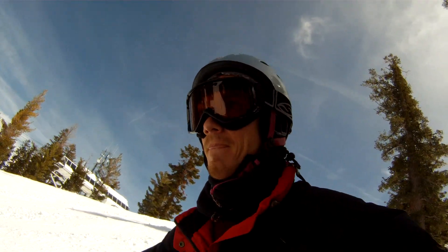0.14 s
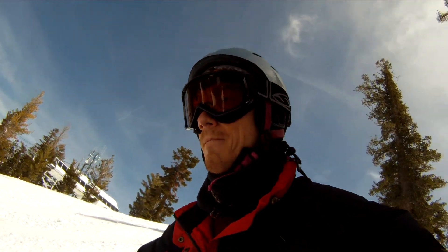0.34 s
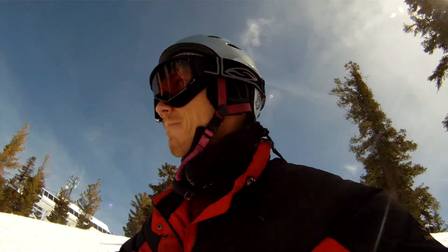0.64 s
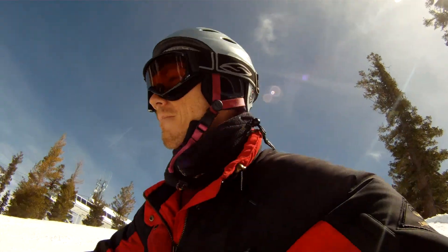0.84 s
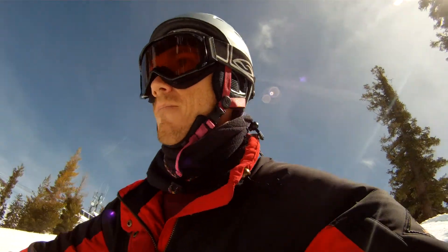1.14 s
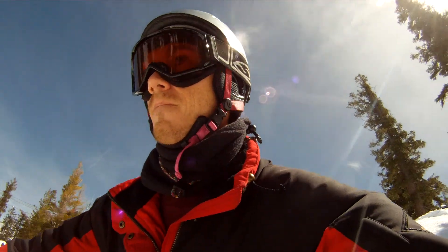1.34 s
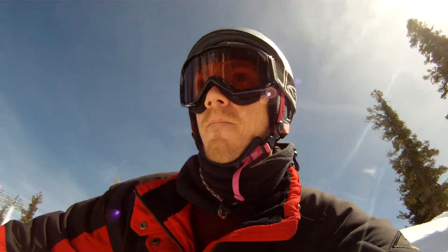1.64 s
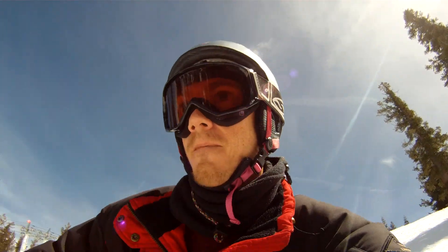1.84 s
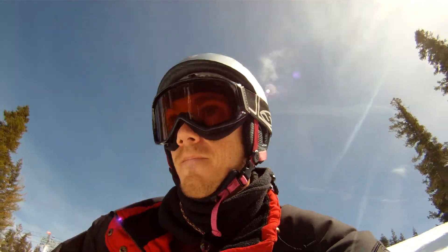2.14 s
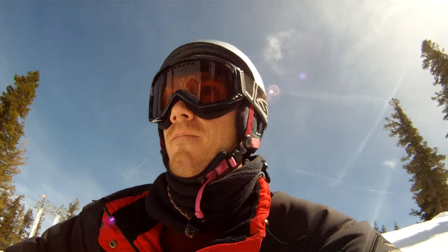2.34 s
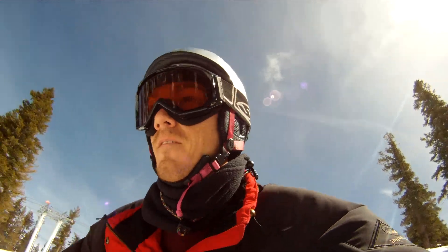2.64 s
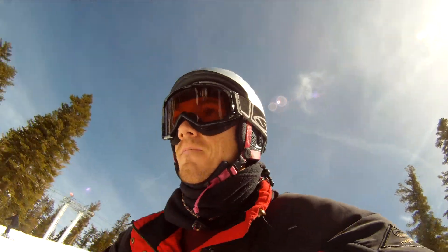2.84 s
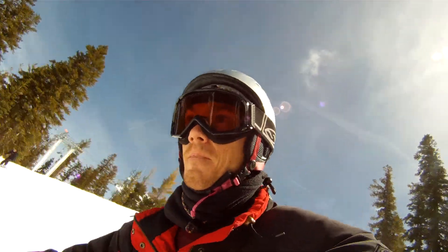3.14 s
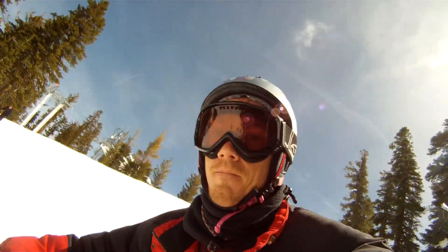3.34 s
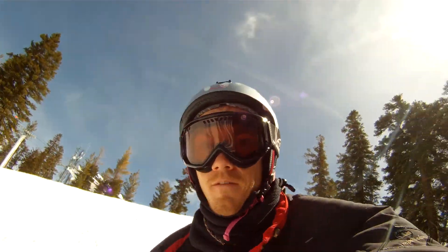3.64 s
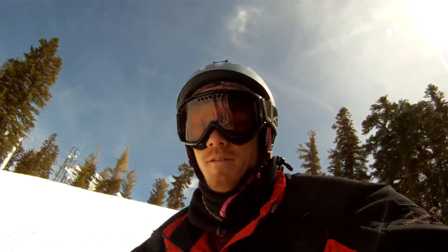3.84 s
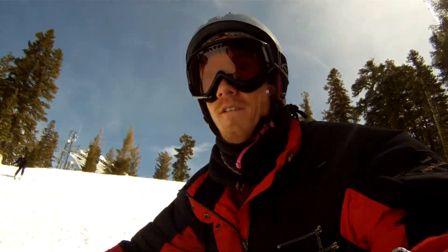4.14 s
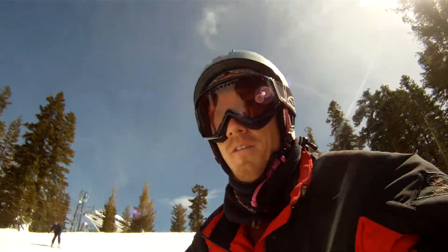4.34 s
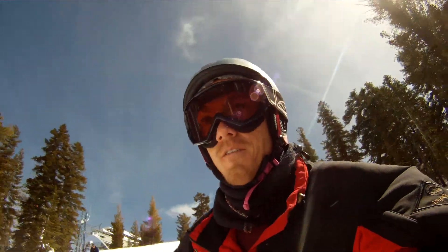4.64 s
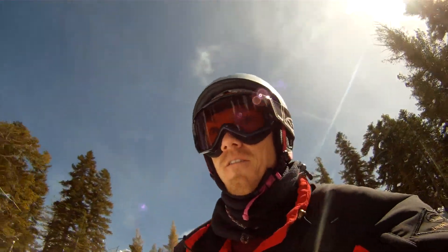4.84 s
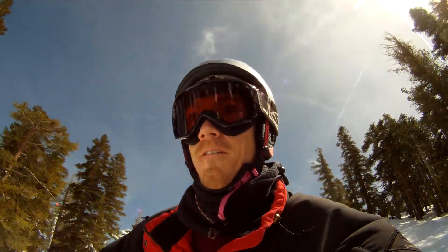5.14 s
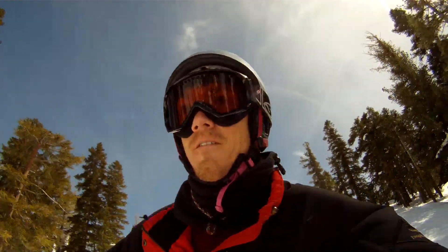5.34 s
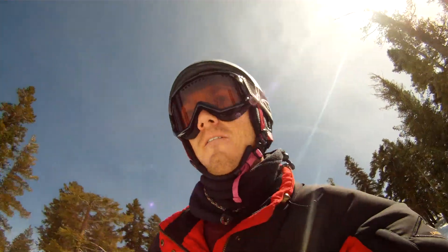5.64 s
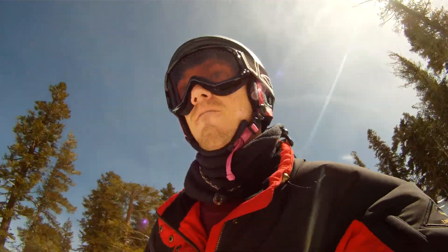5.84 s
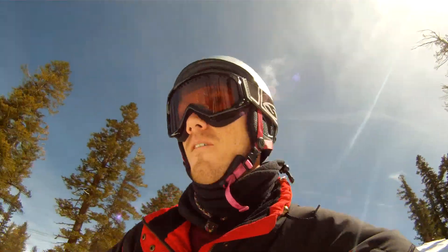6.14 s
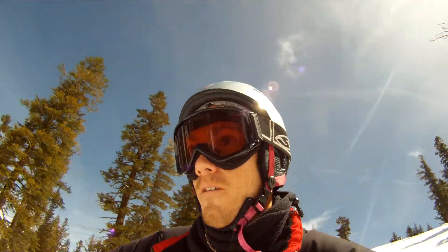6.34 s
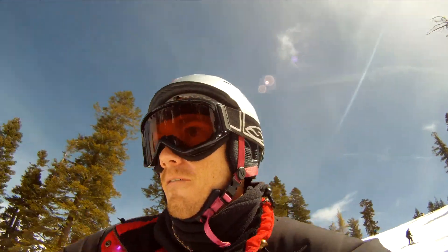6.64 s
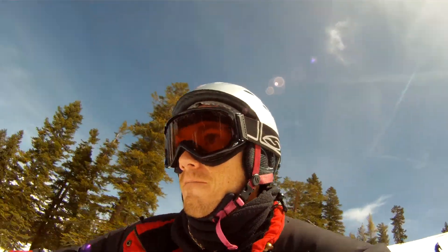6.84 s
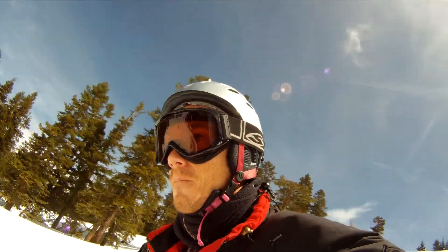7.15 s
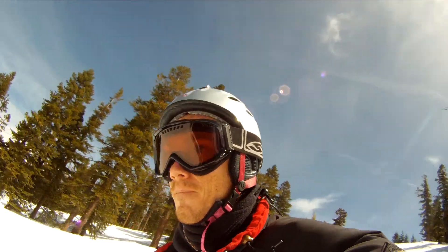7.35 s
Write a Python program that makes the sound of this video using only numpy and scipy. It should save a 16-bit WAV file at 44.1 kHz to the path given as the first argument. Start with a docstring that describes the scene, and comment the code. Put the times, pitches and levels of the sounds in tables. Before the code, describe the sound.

Skis swish and scrape over soft snow, muffled and hollow, over low wind rumble, with a brief plastic clatter midway.

```python
"""Skis glide and turn on soft snow: they swish as they break crystals, scrape and throw spray.
Now and then they crush a lump of crust, and the boards rumble with speed. It is all heard from inside
a closed plastic camera housing on a hand-held pole, which gives it a hollow ring. Wind and bumps
rumble below, flecks of snow tick on the housing, and in one turn the pole clacks in its mount."""
import sys
import numpy as np
from scipy import signal
from scipy.fft import rfft, irfft, next_fast_len
from scipy.io import wavfile

SR = 44100
rng = np.random.default_rng(int(sys.argv[2]) if len(sys.argv) > 2 else 0)


def dump(signal):
    """Clip the signal to [-1, 1] and save it as 16-bit WAV at the path in sys.argv[1]."""
    limited = np.clip(np.atleast_2d(signal).T, -1, 1)
    pcm = np.round(limited * 32767).astype(np.int16)
    wavfile.write(sys.argv[1], SR, pcm)


N = 331191
TIME = np.arange(N) / SR
FFT_SIZE = 2 * next_fast_len(N // 2 + SR // 2)
FREQS = np.maximum(np.fft.rfftfreq(FFT_SIZE, 1 / SR), 1)

# how strong the low and high parts of the wind and the boards' rumble are: f/Hz, level/dB
WIND_SPECTRUM = [(5, -17), (14, 1.5), (26, 0.5), (50, -6.5), (80, -11.5), (105, -15.5), (160, -22.5),
                 (260, -28), (600, -42), (2000, -87)]
BOARD_SPECTRUM = [(60, -47), (130, 9), (260, 2.5), (340, 1.5), (500, 1), (800, -1), (1100, -0.5), (1700, 0),
                  (3000, -34), (6000, -56)]
# bumps that shake the housing: t/s, peak level/dB, half length/s, time the pole wobbles on/s
BUMPS = [(.212, -33, 0.0066, .22), (.797, -37, 0.0057, 0), (1.065, -35.5, .008, 0), (2.8, -35, 0.0085, .16),
         (3.994, -36, .0022, 0), (4.172, -31.5, 0.0013, 0), (4.187, -31, 0.00077, 0),
         (4.263, -31.5, .003, 0), (5.1437, -30, 0.0019, 0), (5.406, -33, 0.0072, .09),
         (6.464, -30.5, 0.011, 0), (6.936, -32, .008, 0)]
# the pole strikes its mount: t/s, level/dB, brightness f/Hz
POLE_KNOCKS = [(3.9868, -19, 450), (4.076, -30, 1500), (4.084, -26.5, 1200), (4.176, -23, 2000),
               (4.1861, -16, 2500), (4.1897, -5.5, 1700), (4.1947, -15.5, 3000), (4.1966, -16, 12000),
               (4.202, -31, 12000), (4.2085, -28, 9000), (4.264, -26, 1200), (4.434, -29, 1500),
               (4.528, -34, 1200)]
# the pole shudders through the hardest turn: t/s, level/dB
POLE_SHUDDER = [(3.95, -63), (4.05, -52), (4.2, -44), (4.38, -46.5), (4.49, -49.5), (4.56, -61)]
# tones that the pole and the housing wall ring with: f/Hz, level/dB, time to fade by 60 dB/s
POLE_TONES = [(239, -27, 0.013), (454, -13, 0.012), (680, -13.5, 0.026), (1150, -1.5, 0.012),
              (1316, -1.5, 0.024), (1540, -2.5, 0.034), (2007, -3, 0.041), (2380, -4.5, 0.017),
              (3532, -6.5, 0.039), (4980, -11, 0.0052), (7100, -16, .01), (8360, -12.5, 0.038),
              (9740, -7.5, 0.014), (9980, -7, 0.026), (10650, -4.5, 0.02), (13520, -5, 0.017),
              (14020, -3, .018)]
WALL_TONES = [(190, -12, 0.017), (344, -10, 0.0084), (796, -23, 0.0023), (1520, -15.5, 0.018),
              (1893, -5, 0.009), (2215, 1.5, 0.0055), (2900, -2.5, 0.0051), (3800, -13, 0.0067),
              (4430, -14, 0.0039), (6850, -17, 0.0054), (8950, -10, 0.0043), (10070, -13.5, 0.012),
              (14100, -12, 0.011), (14700, -17, .006)]
# flecks of snow hit the housing: t/s, level/dB, pitch of the spot f/Hz
SNOW_FLECKS = [(0.1353, -33, 2880), (0.1354, -30, 1400), (0.5317, -31.5, 3740), (0.725, -31, 2480),
               (.764, -29, 2420), (0.7706, -30, 1420), (2.9728, -31.5, 2320), (3.061, -37.5, 3100),
               (3.5632, -29, 2450), (4.577, -33, 1900), (4.5956, -30, 1880), (5.1415, -17, 2010),
               (5.142, -26, 2000), (7.3952, -28.5, 2070)]
# what the housing lets through from each source: f/Hz, width/Hz, level/dB
SHUDDER_COLOUR = [(250, 120, -5), (580, 110, -1), (758, 89, 5.5), (914, 58, 0), (1250, 200, -6),
                  (1540, 140, 0), (1900, 290, 2.5), (3430, 140, 5.5), (3900, 610, -2.5), (8370, 810, -6)]
SPRAY_COLOUR = [(3780, 700, -0.5), (4803, 630, 1), (5543, 420, -4.5), (6450, 430, -5), (7135, 570, -2.5),
                (8240, 1700, -8.5)]
EDGE_COLOUR = [(720, 78, -10.5), (900, 300, -17), (1266, 198, 1), (1430, 250, -3.5), (2010, 390, -6.5),
               (10630, 370, -17), (13360, 310, -18.5)]
SWISH_COLOUR = [(1910, 260, -1), (2224, 300, 0.5), (2528, 380, -2), (2906, 350, -5.5), (3247, 380, -4),
                (3570, 254, -4.5), (3890, 380, -16), (5170, 610, -24.5), (8500, 550, -12),
                (9100, 920, -15.5), (9740, 700, -12), (12000, 3000, -39), (14100, 620, -14.5),
                (14800, 520, -14.5)]
# lumps of crust under a ski: t/s, level/dB, half length/s, iciness from 0 to 1
CRUST_LUMPS = [(0.529, -37.5, .008, 0), (.57, -48, 0.027, 0.01), (1.325, -46, 0.055, 0),
               (1.47, -45, 0.0042, 0), (1.546, -43.5, .025, 0.01), (1.781, -47, .007, .7),
               (1.962, -40.5, .0047, 0), (2.022, -43, .0035, 0), (2.36, -41.5, .014, 0.07),
               (2.421, -46, .015, 0.1), (2.558, -42, 0.0038, 0), (2.792, -44.5, .011, 0),
               (3.303, -45.5, .014, 0), (3.372, -46, .035, 0.06), (3.57, -39, 0.0059, 0.03),
               (4.372, -41.5, 0.033, 0), (5.47, -42, 0.024, 0), (5.724, -41, 0.004, 0),
               (6.685, -43, .05, 0.5), (7.106, -41.5, .0022, 0.7), (7.151, -46, .009, .5)]
# speed over the snow and how hard the skis press on it, both as loudness: t/s, level/dB
SKI_SPEED = [(0.0, -61.5), (2.48, -57), (3.01, -63.5), (3.61, -57), (3.99, -58.5), (4.24, -51), (4.55, -59),
             (4.84, -58), (5.87, -53.5), (7.5, -57.5)]
SKI_PRESSURE = [(0.0, -49), (0.44, -48), (0.79, -49.5), (1.06, -48.5), (1.38, -47.5), (1.86, -48),
                (2.13, -50.5), (2.42, -51.5), (2.59, -51), (2.92, -54), (3.32, -52.5), (3.49, -48),
                (3.68, -46), (4.05, -47.5), (4.28, -45.5), (4.53, -50.5), (4.68, -51.5), (5.16, -51.5),
                (5.64, -48), (6.2, -48.5), (6.43, -45.5), (6.58, -43.5), (7.08, -51), (7.5, -52)]
# the tails skid out, the edges bite: start t/s, end t/s, level/dB relative to the pressure
TAIL_SKIDS = [(.02, .3, -10), (1.62, 2.15, -6), (2.26, 2.76, -6.5), (3.2, 3.4, -5.5), (4.9, 5.5, -13),
              (6.3, 6.55, -10.5), (6.55, 7.06, -4.5), (7.2, 7.28, -3.5)]
EDGE_BITES = [(-.1, .3, -5), (.33, .53, -2), (.78, 1.1, -2), (1.15, 1.72, 0.7), (1.8, 1.95, -3.5),
              (2.05, 2.7, -9), (2.33, 2.38, -4.5), (2.54, 2.58, -4.5), (3.27, 3.33, -4), (4.89, 5.27, -0.5),
              (5.36, 5.75, -7.5), (5.8, 6.33, -4.5), (6.4, 6.6, -3), (6.7, 7.05, -4.5), (7.31, 7.6, -4)]


def from_db(db):
    """Turn decibels into a factor to multiply by."""
    return 10 ** (np.asarray(db) / 20)


def rms_one(x):
    """Scale a signal to an average power of 1."""
    return x / np.sqrt(np.mean(x ** 2) + 1e-20)


def in_time(curve):
    """Join a curve's points with straight lines, one value per sample."""
    return np.interp(TIME, *np.transpose(curve))


def shaped(x, gain):
    """Filter with one gain per frequency, then scale to power 1."""
    return rms_one(irfft(rfft(x, FFT_SIZE) * gain, FFT_SIZE)[:N])


def slope(points):
    """Gain per frequency, joining points along a pitch scale."""
    hz, db = np.transpose(points)
    return from_db(np.interp(np.log(FREQS), np.log(hz), db))


def humps(bands):
    """Gain per frequency for a set of steep-sided peaks."""
    powers = (from_db(db) ** 2 / (1 + (2 * (FREQS - hz) / width) ** 4) for hz, width, db in bands)
    return np.sqrt(sum(powers))


def drift(rate_hz):
    """A smooth random wander, about 1 in size."""
    return shaped(rng.standard_normal(N), 1 / (1 + (FREQS / rate_hz) ** 2))


def crunch(per_s, spread_db, hiss_db):
    """Tiny random contacts, mostly weak, over the smooth hiss of sliding."""
    sizes = from_db(spread_db * np.minimum(rng.exponential(1, N), 5)) * rng.choice([-1, 1], N)
    grains = rms_one(sizes * (rng.random(N) < per_s / SR))
    return rms_one(grains + from_db(hiss_db) * rng.standard_normal(N))


def held(strokes, rise_s, fade_s, floor_db):
    """Gain of strokes that swell, hold and fade after their end, on top of a steady floor."""
    power = from_db(floor_db) ** 2
    for start, end, db in strokes:
        swell = np.clip((TIME - start) / rise_s, 0, 1)
        fade = np.clip(1 - (TIME - end) / fade_s, 0, 1)
        power += (from_db(db) * swell * fade) ** 2
    return np.sqrt(power)


def blows(times, db):
    """Clicks at the given times and levels."""
    clicks = np.zeros(N)
    clicks[np.round(times * SR).astype(int)] = from_db(db)
    return clicks


def ring(clicks, hz, fade_s):
    """Each click starts a pure tone that fades by 60 dB in fade_s."""
    decay, angle = from_db(-60 / (fade_s * SR)), 2 * np.pi * hz / SR
    return signal.lfilter([0, np.sin(angle)], [1, -2 * decay * np.cos(angle), decay ** 2], clicks + 1e-18)


def struck(tones, times, db, colour_db):
    """Blows ring all of an object's tones, each turned up or down by colour_db(hz)."""
    spot_db = 0.7 * rng.standard_normal((len(times), len(tones)))  # the spot struck varies a little
    out = np.zeros(N)
    for k, (hz, tone_db, fade_s) in enumerate(tones):
        clicks = blows(times, db + tone_db + colour_db(hz) + spot_db[:, k])
        out += (-1) ** k * ring(clicks, hz, fade_s)
    return out


def wind(speed_db):
    """Gusts push on the closed housing, harder at higher speed."""
    level_db = -44 + 0.51 * (speed_db - np.mean(speed_db))
    gusts = rng.standard_normal(N) * from_db(0.94 * drift(rate_hz=6))
    return from_db(level_db) * shaped(gusts, slope(WIND_SPECTRUM))


def jolts(wobble_s=0.0636):
    """A bump bends the housing: the air pressure inside dips and swings back, again on each wobble."""
    out = np.zeros(N)
    for at, peak_db, half_length, wobbles_for in BUMPS:
        for swing in range(1 + int(wobbles_for / wobble_s)):
            offset = (TIME - at - swing * wobble_s) / half_length
            out += from_db(peak_db) * offset * np.exp((1 - np.minimum(offset ** 2, 100)) / 2)
    return out


def pole(gain_db):
    """The pole shudders and clacks in its mount; soft knocks barely ring the high tones."""
    times, db, bright_hz = np.transpose(POLE_KNOCKS)
    clacks = struck(POLE_TONES, times, db + gain_db, lambda hz: -10 * np.log10(1 + (hz / bright_hz) ** 2))
    in_turn = (TIME > POLE_SHUDDER[0][0]) & (TIME < POLE_SHUDDER[-1][0])
    rattle = shaped(crunch(per_s=300, spread_db=1.5, hiss_db=-4), humps(SHUDDER_COLOUR))
    return clacks + in_turn * from_db(in_time(POLE_SHUDDER)) * rattle


def snow_ticks(wall_db, spot_db):
    """Hard flecks ring the whole housing wall and, briefly, the spot they hit."""
    times, levels, spot_hz = np.transpose(SNOW_FLECKS)
    # wall tones away from the spot's pitch are up to 1 dB weaker
    wall = struck(WALL_TONES, times, levels + wall_db, lambda hz: -np.minimum(abs(np.log2(hz / spot_hz)), 1))
    spots = sum(ring(blows(at, db + spot_db), hz, fade_s=0.013) for at, db, hz in SNOW_FLECKS)
    return wall + spots


def crusts(gain_db):
    """A lump gives way in a burst of grains; icy ones sound like spray, soft ones like the swish."""
    soft_power, icy_power = np.zeros(N), np.zeros(N)
    for at, db, half_length, iciness in CRUST_LUMPS:
        power = from_db(db + gain_db) ** 2 * np.exp(-np.minimum(((TIME - at) / half_length) ** 2, 20))
        soft_power += power * (1 - iciness)
        icy_power += power * iciness
    grains = crunch(per_s=2700, spread_db=3, hiss_db=-6)
    soft = np.sqrt(soft_power) * shaped(grains, humps(SWISH_COLOUR))
    icy = np.sqrt(icy_power) * shaped(grains, humps(SPRAY_COLOUR))
    return soft + icy


def board_rumble(level_db):
    """The boards rumble as they run over the snow."""
    return from_db(level_db) * shaped(rng.standard_normal(N), slope(BOARD_SPECTRUM))


def tail_spray(level_db, per_s):
    """The ski tails throw snow: a little when running flat, more in a skid."""
    skid = held(TAIL_SKIDS, rise_s=0.15, fade_s=0.2, floor_db=-11.5)
    grains = crunch(per_s, spread_db=3.5, hiss_db=2.5)
    return skid * from_db(level_db) * shaped(grains, humps(SPRAY_COLOUR))


def edge_scrape(level_db, per_s):
    """The edges scrape: lightly when running flat, harder when they bite."""
    bite = held(EDGE_BITES, rise_s=0.041, fade_s=0.18, floor_db=-13)
    grains = crunch(per_s, spread_db=1, hiss_db=1)
    return bite * from_db(level_db) * shaped(grains, humps(EDGE_COLOUR))


def base_swish(level_db, per_s):
    """The undersides of the skis slide along and break snow crystals."""
    grains = crunch(per_s, spread_db=3, hiss_db=4.5)
    return from_db(level_db) * shaped(grains, humps(SWISH_COLOUR))


def skis(speed_db):
    """Pressing harder makes all four ski sounds louder; uneven snow makes them flutter together."""
    pressure_db = in_time(SKI_PRESSURE)
    extra_db = pressure_db - np.mean(pressure_db)
    crystals_per_s = 4000 * from_db(extra_db)  # more pressure breaks more crystals
    uneven, edge_chatter = drift(rate_hz=20), drift(rate_hz=65)
    swish = base_swish(pressure_db + 1 + 1.25 * uneven, crystals_per_s)
    scrape = edge_scrape(pressure_db + 0.93 * uneven + 0.96 * edge_chatter, crystals_per_s)
    spray = tail_spray(pressure_db + 0.35 * uneven + 1.24 * edge_chatter, crystals_per_s)
    rumble = board_rumble(speed_db + 1.5 + 0.27 * extra_db + 0.97 * uneven)
    return swish + scrape + spray + rumble


def scene():
    """Add it all up in one channel; open air over snow gives no echo."""
    speed_db = in_time(SKI_SPEED)
    snow = skis(speed_db) + crusts(gain_db=-3.5) + snow_ticks(wall_db=0.5, spot_db=-1)
    camera = wind(speed_db) + jolts() + pole(gain_db=-5.5)
    return (snow + camera)[None, :]


def record(dry):
    """Cut the highest treble off steeply."""
    cutoff_hz = 15300
    return signal.sosfilt(signal.ellip(12, .1, 80, cutoff_hz, fs=SR, output="sos"), dry)


dry = scene()
out = record(dry)
dump(out)
```